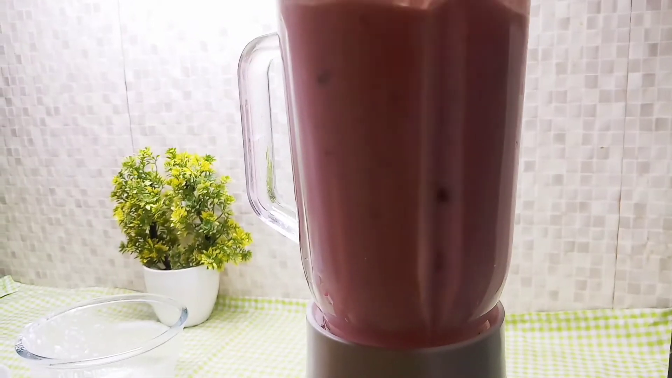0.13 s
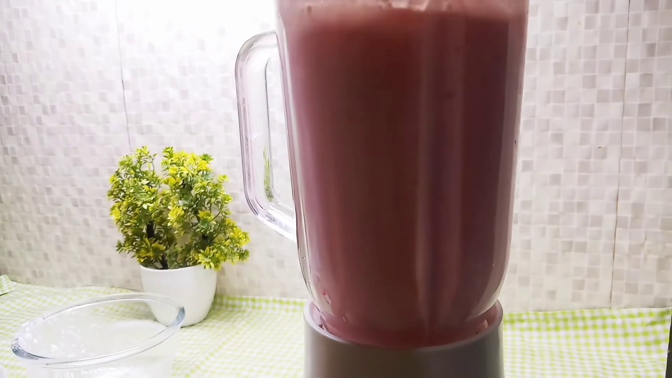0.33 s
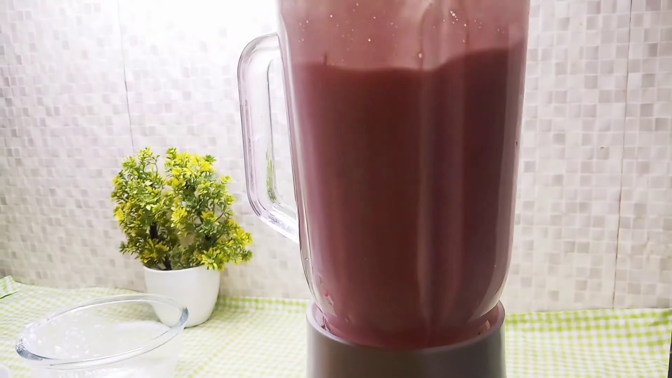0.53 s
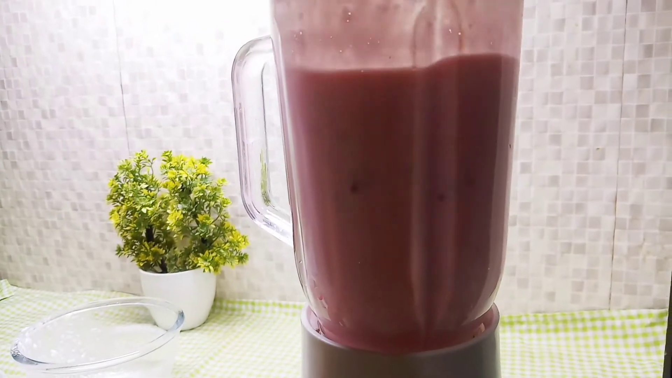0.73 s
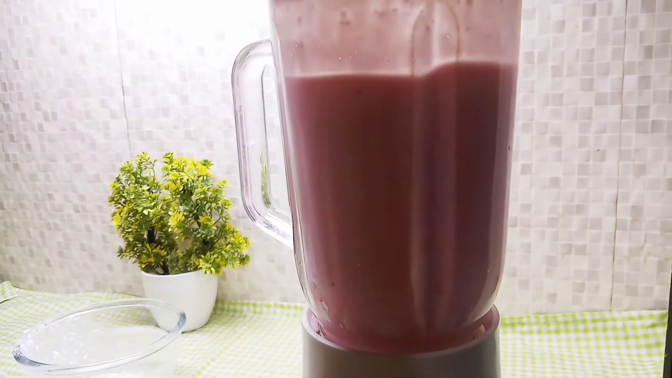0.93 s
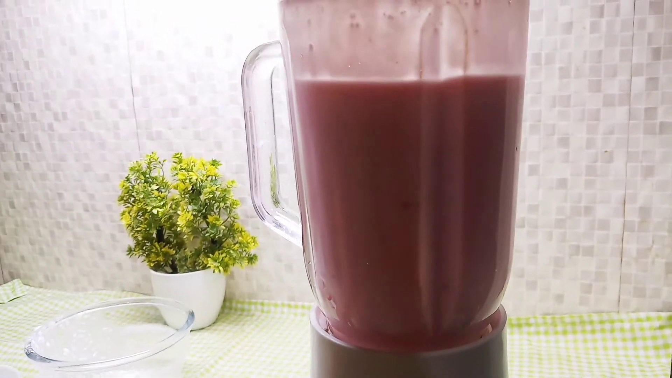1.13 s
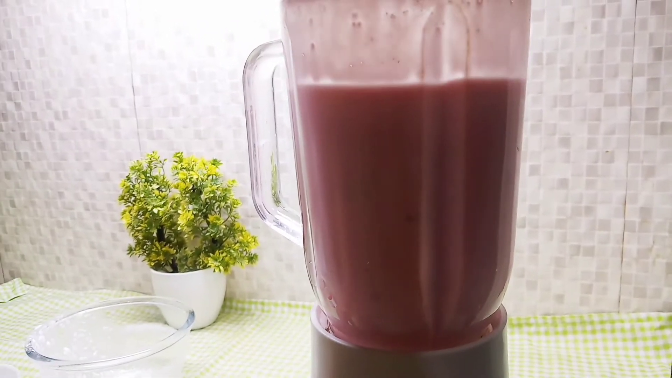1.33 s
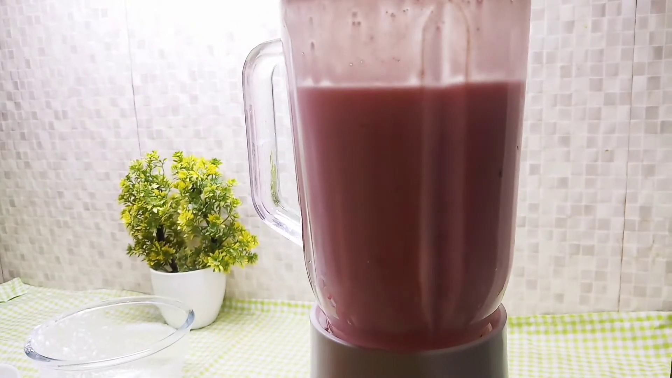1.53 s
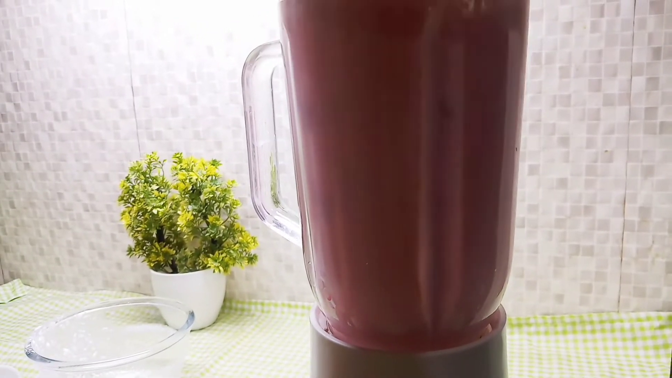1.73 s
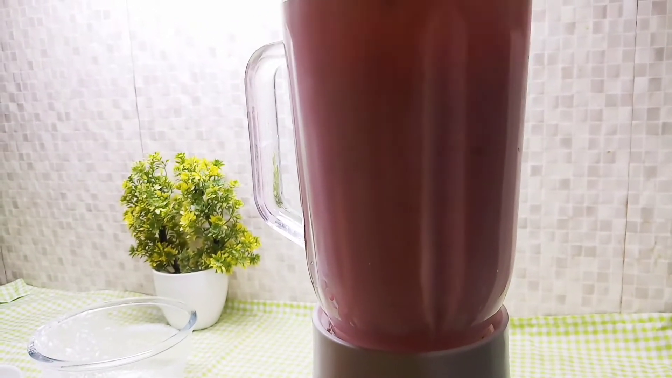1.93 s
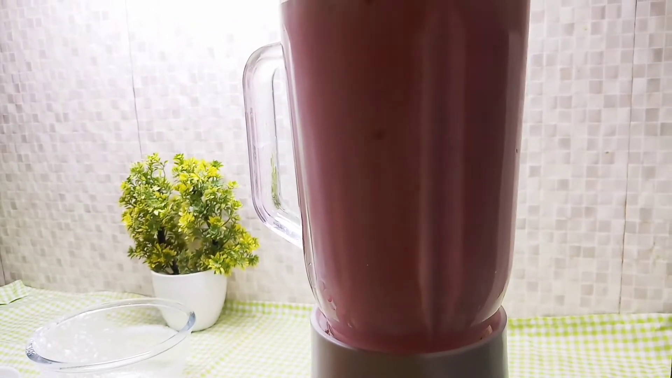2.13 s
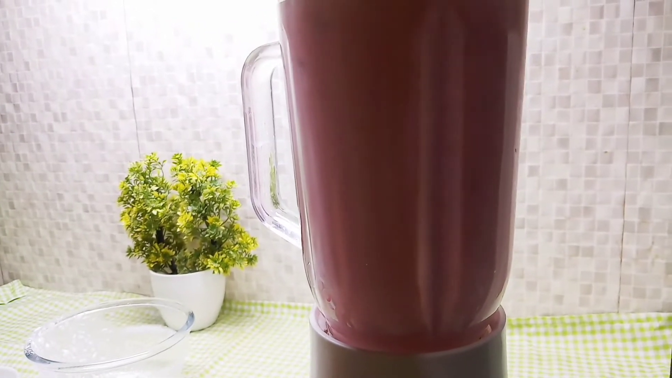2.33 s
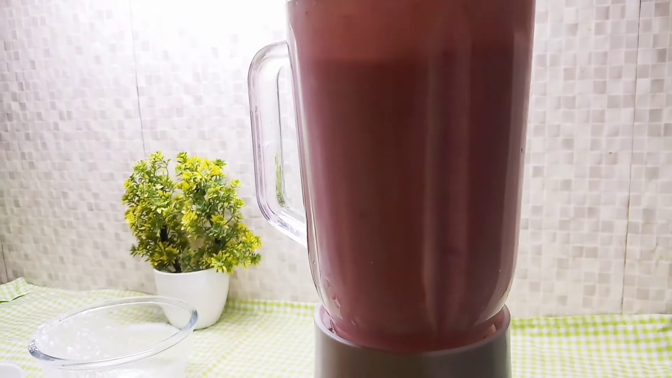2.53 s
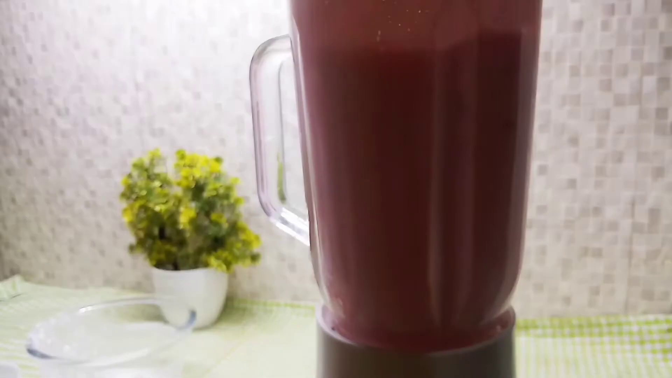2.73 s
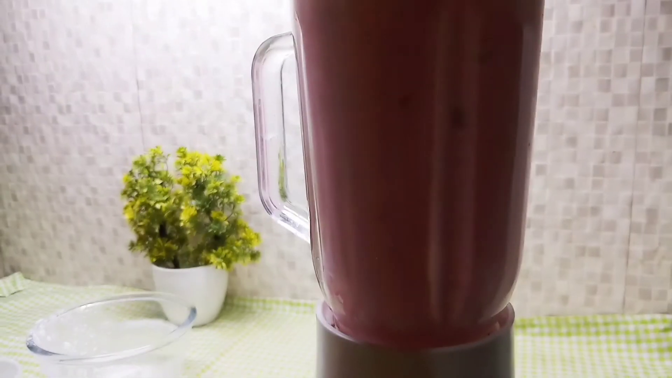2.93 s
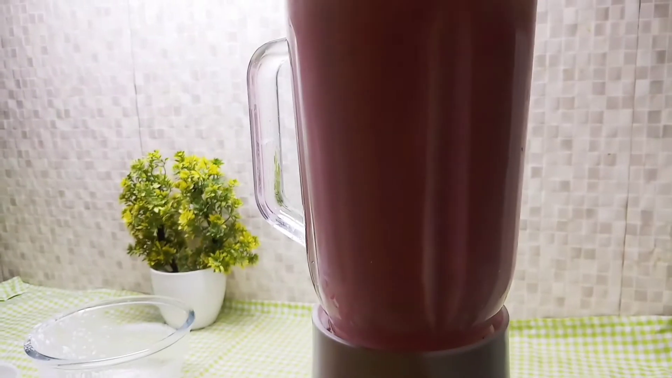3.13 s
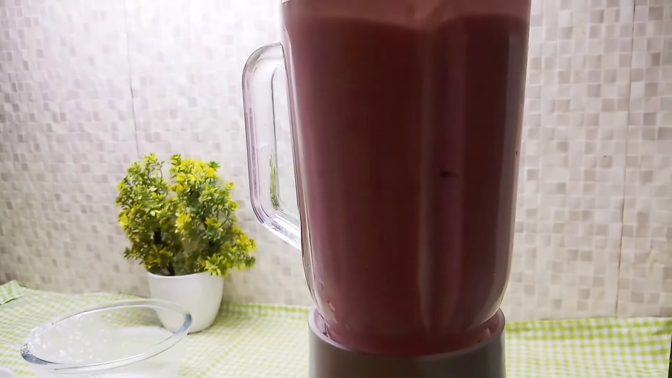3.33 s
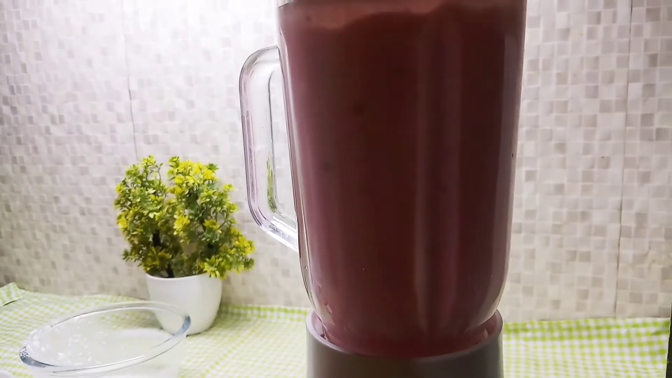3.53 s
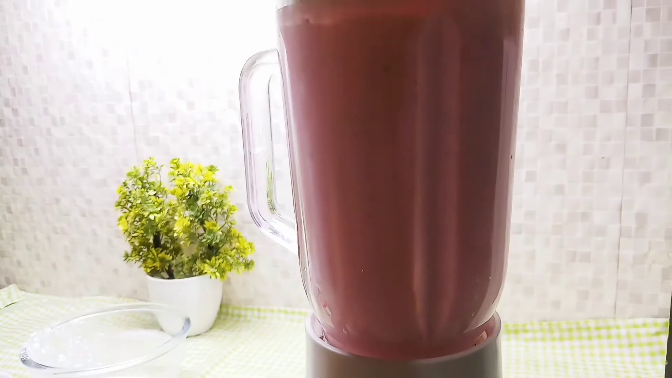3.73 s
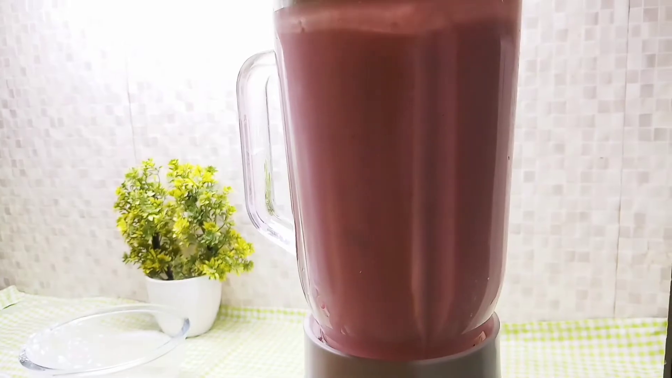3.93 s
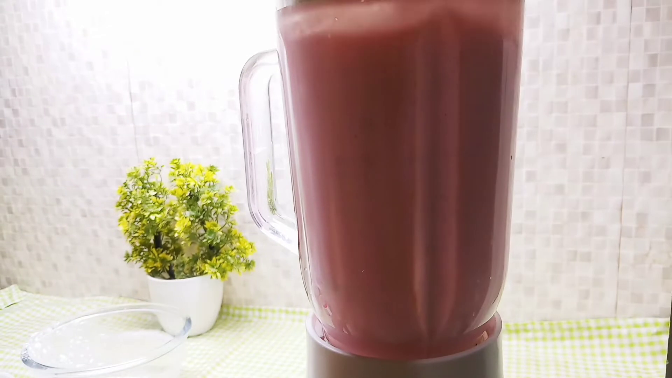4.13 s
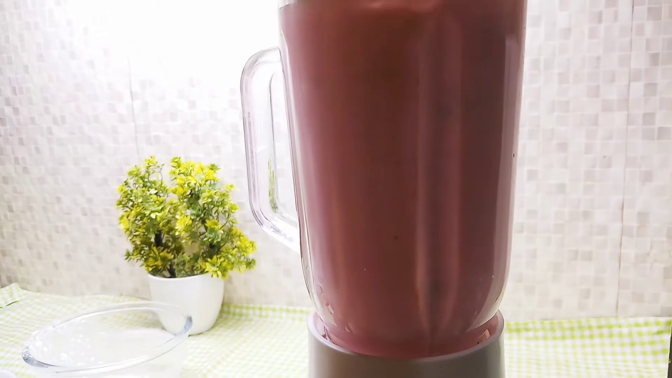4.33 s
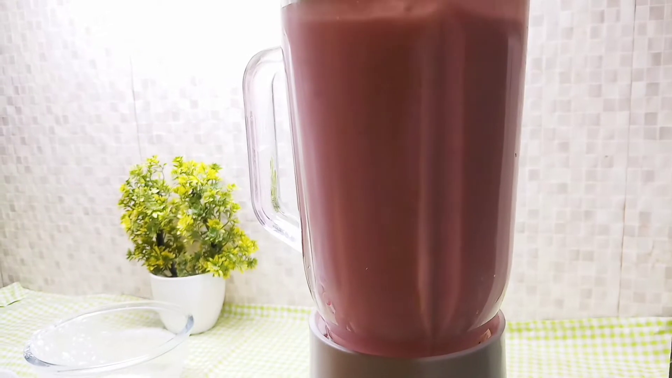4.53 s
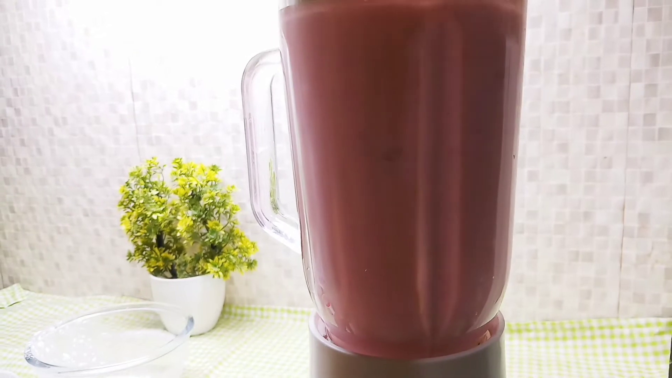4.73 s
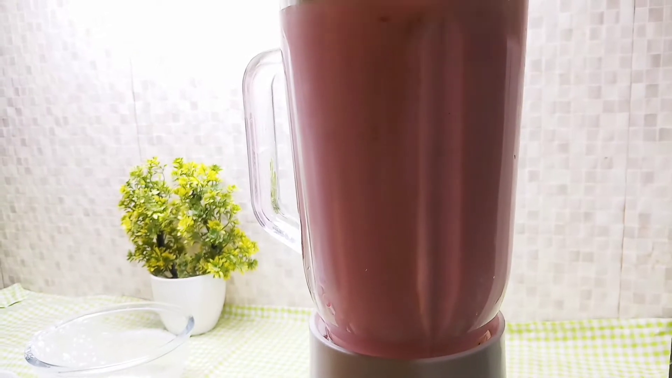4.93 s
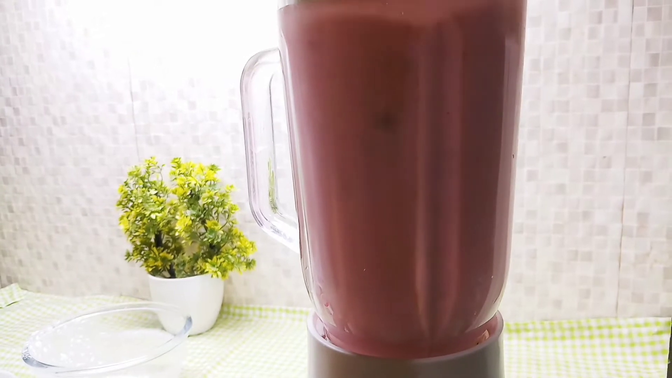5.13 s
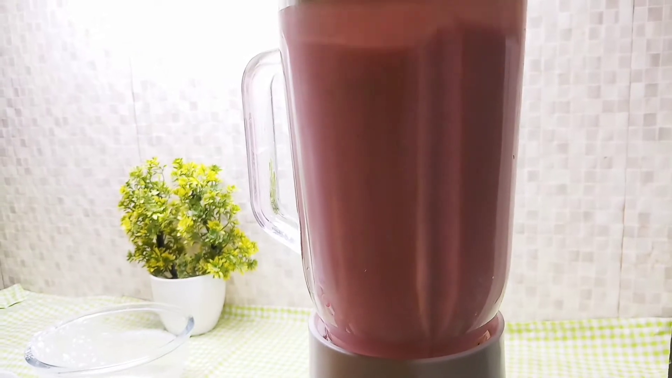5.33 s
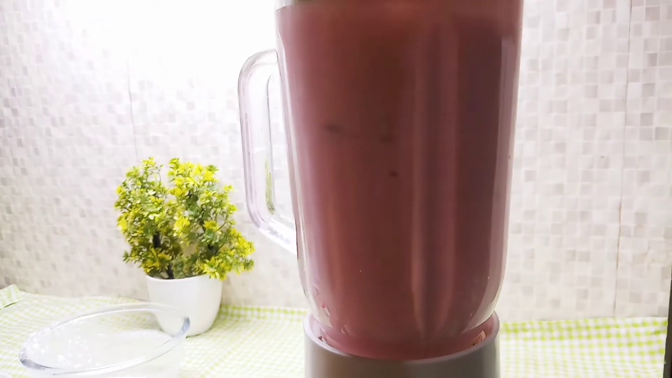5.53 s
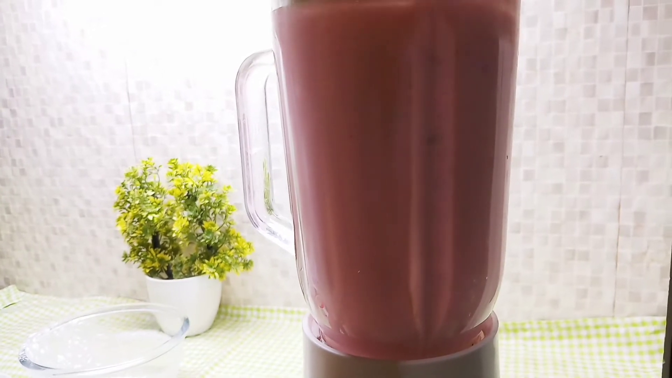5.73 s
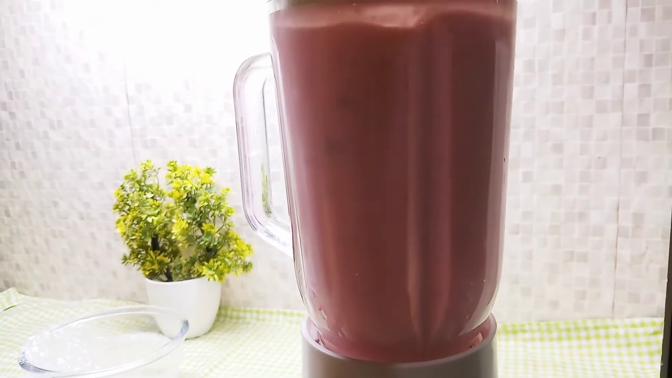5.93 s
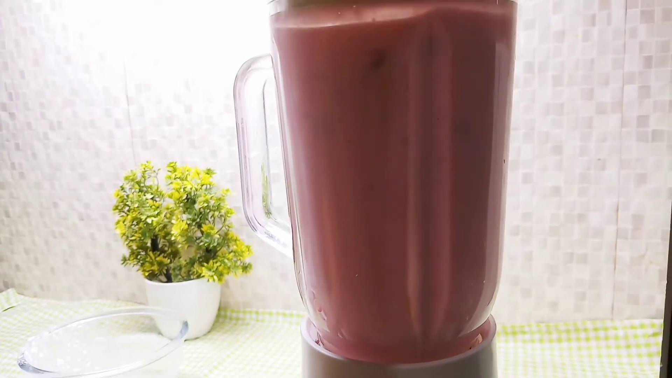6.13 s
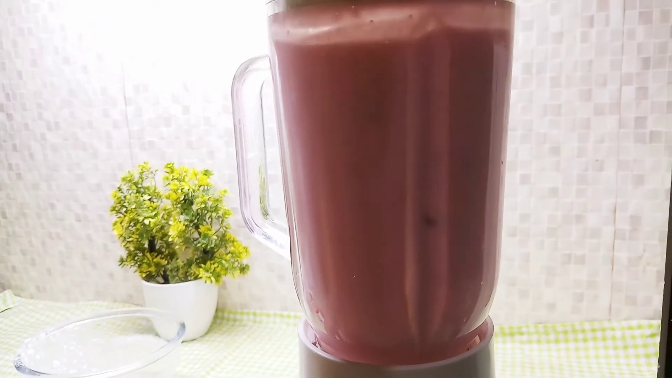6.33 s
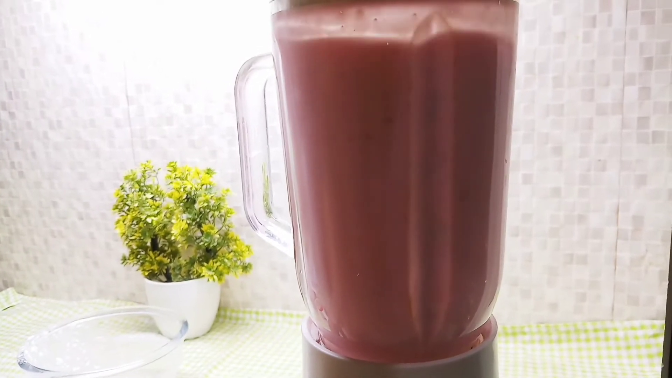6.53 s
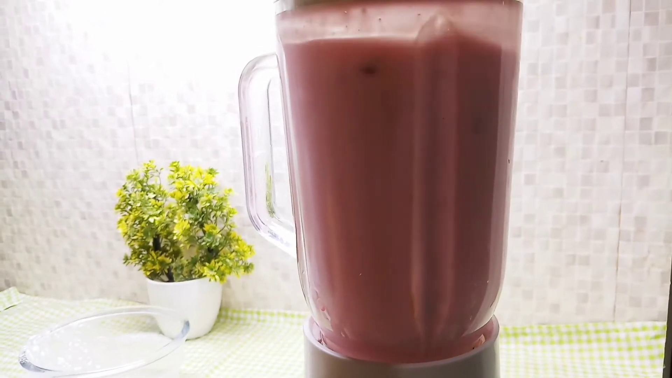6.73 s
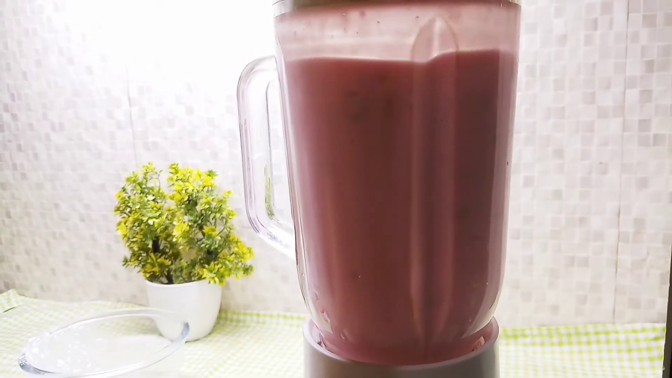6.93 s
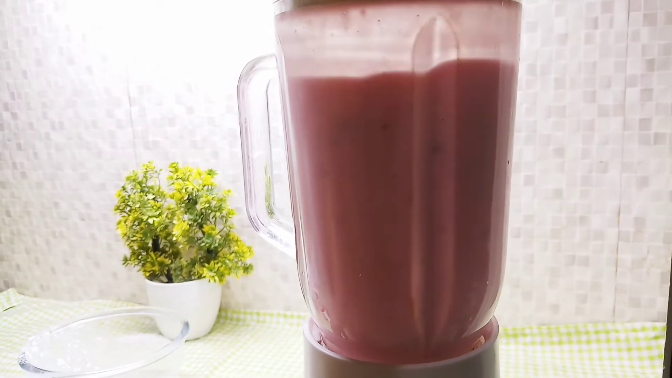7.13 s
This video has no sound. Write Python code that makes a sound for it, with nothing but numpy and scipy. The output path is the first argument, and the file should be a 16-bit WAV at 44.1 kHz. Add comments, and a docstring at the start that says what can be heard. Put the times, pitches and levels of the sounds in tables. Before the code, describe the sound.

A countertop blender coasts to rest, restarts with thick gulps and cracking ice, churns at full speed, then winds down.

```python
"""Ice swirls and clicks in a thick fruit drink as a countertop blender coasts to rest; a few drops fall.
It starts again with heavy gulps and cracks, runs flat out, then winds down.
The blades churn the liquid and grind ice against the ringing jar; the motor hums and whines below.
One microphone position, near the jar, on a worktop close to a tiled kitchen wall."""
import sys
import numpy as np
from scipy import signal
from scipy.fft import rfft, irfft, next_fast_len
from scipy.io import wavfile
from scipy.ndimage import map_coordinates

SR = 44100
rng = np.random.default_rng(int(sys.argv[2]) if len(sys.argv) > 2 else 0)


def file_out(sig):
    """Save sig as 16-bit WAV at sys.argv[1]."""
    # one column per channel
    cols = np.atleast_2d(sig).T
    # limit, then scale
    lim = np.clip(cols, -1, 1)
    pcm = np.round(lim * 32767).astype(np.int16)
    wavfile.write(sys.argv[1], SR, pcm)


N = 316197
TIME = np.arange(N) / SR
EARLIER_OFF_S, ON_S, OFF_S = -.76, 1.27, 5.9  # the switch; the scene opens mid-coast
RUN_S = np.clip(TIME, ON_S, OFF_S) - ON_S  # time spent under power
FULL_SPEED, FRICTION = 180, 35  # turns per s; at the second, liquid drag equals dry friction


def from_db(db):
    """Decibels to gain."""
    return 10 ** (np.asarray(db) / 20)


def rms_one(x):
    """Scale to unit power."""
    return x / np.sqrt(np.mean(x ** 2) + 1e-20)


def drift(per_s):
    """Smooth random wander of unit power."""
    knots = rng.standard_normal(8192)
    return rms_one(map_coordinates(knots, [TIME * per_s], order=2, mode="wrap"))


def swell(at_s, length_s):
    """A smooth rise and fall of height 1, length_s wide at half height."""
    out, near = np.zeros(N), np.abs(TIME - at_s) < length_s
    out[near] = np.cos(np.pi / 2 * (TIME[near] - at_s) / length_s) ** 2
    return out


def lag(x, time_s):
    """Trail behind x with the given time constant."""
    keep = np.exp(-1 / (time_s * SR))
    return signal.lfilter([1 - keep], [1, -keep], x)


def grit(per_s, spread_db):
    """Random tiny impacts, mostly weak, a few strong; about unit power at any rate."""
    sizes = rms_one(from_db(spread_db * np.minimum(rng.exponential(1, N), 4)) * rng.choice([-1, 1], N))
    chance = np.clip(per_s / SR, 1 / N, 1)
    return sizes * (rng.random(N) < chance) / np.sqrt(chance)


def burst(start_s, decay_s, rise_s=.0002, size=4096):
    """One contact: noise that builds up and dies away quickly."""
    out, at, t = np.zeros(N + size), round(start_s * SR), np.arange(size) / SR
    shape = (1 - np.exp(-t / rise_s)) * np.exp(-t / decay_s)
    out[at:at + size] = rng.standard_normal(size) * shape
    return out[:N]


def lift(modes, hz):
    """Gain in dB of a set of resonances."""
    return sum(db / (1 + (2 * (hz - centre) / width) ** 2) for centre, width, db in modes)


def body(x, spectrum, modes=(), size=8192):
    """Minimum-phase filter of unit energy: a broad spectrum with resonances on top."""
    hz = np.maximum(np.fft.rfftfreq(size, 1 / SR), 1)
    points_hz, points_db = np.transpose(spectrum)
    gain_db = np.interp(np.log(hz), np.log(points_hz), points_db) + lift(modes, hz)
    cepstrum = irfft(np.log(from_db(gain_db)))
    response = irfft(np.exp(rfft(2 * cepstrum[:size // 2], size)))
    return signal.oaconvolve(x, response / np.linalg.norm(response))[:N]


def coast(off_s, drag_s=.95):
    """Drag and friction slow the shaft from full speed until it stands."""
    elapsed_s = np.maximum(TIME - off_s, 0)
    return np.maximum((FULL_SPEED + FRICTION) * np.exp(-elapsed_s / drag_s) - FRICTION, 0)


def shaft(spin_up_s=.19):
    """Turns per second: coasting, running up, braked briefly after each knock, coasting again."""
    sag = 13 * sum(from_db(db) * swell(s + .06, length_s=.15) for s, db in WALL_KNOCKS)
    loaded = 178.8 + .5 * RUN_S - sag  # gains a little as the drink thins
    driven = loaded * (1 - np.exp(-RUN_S / spin_up_s)) * (1 + .004 * drift(8))
    return np.where(TIME < ON_S, coast(EARLIER_OFF_S), driven * coast(OFF_S) / FULL_SPEED)


def stirring(speed):
    """Stirring in turns per second: full under power, then slowing with the blades, settling last."""
    driven = np.where((TIME >= ON_S) & (TIME < OFF_S), FULL_SPEED, speed)
    return np.maximum(driven, lag(np.minimum(driven, FRICTION / 2), time_s=.081)) + 1e-6


def follow(stir, full_db, labour_db, thinning_db_per_s, knee_hz, halving_db):
    """Gain as the blades bite, labour until a vortex opens, run on, then slow below the knee."""
    bite_s, labour_s, relief_s = .053, .21, .14
    bite = np.where(TIME < ON_S, 1, np.minimum(RUN_S / bite_s, 1))
    labour = (TIME >= ON_S) * np.clip(1 - (RUN_S - labour_s) / relief_s, 0, 1)
    slowing_db = halving_db * np.log2(np.minimum(stir / knee_hz, 1))
    return bite * from_db(full_db + labour_db * labour - thinning_db_per_s * RUN_S + slowing_db)


# Resonances of the filled jar on its base: centre_hz, width_hz, lift_db
JAR_MODES = [(144, 21, 14), (244, 20, 0), (342, 88, 6), (704, 47, 8.5), (881, 42, 6.5), (1086, 61, 7),
             (1198, 184, 7.5), (1514, 220, 6.5), (1893, 133, 7.5), (2100, 360, 2), (2520, 31, 2),
             (2750, 69, 6.5), (3026, 94, 3), (3240, 165, 5.5), (3890, 57, 5.5), (4326, 310, 6),
             (4650, 48, 4), (4940, 180, 6), (5330, 280, 4.5), (5700, 77, 4.5), (5863, 220, 6.5),
             (6145, 247, 9.5), (6710, 120, 8.5), (6890, 260, 5), (7290, 340, 7.5), (7920, 390, 8),
             (8830, 190, 6), (10100, 160, 7)]
# Bands the jar mostly radiates poorly: centre_hz, width_hz, lift_db
JAR_HOLLOWS = [(466, 23, -3), (985, 100, 0), (1934, 72, 2), (2380, 62, -7.5), (3700, 150, -0.5),
               (6530, 330, -3), (7700, 250, -3)]
def jar(x, spectrum):
    """Sound leaves through the jar wall and takes on its peaks and hollows."""
    return body(x, spectrum, list(JAR_MODES) + list(JAR_HOLLOWS))


# Paths of a shock round the jar: delay_s, feedback_share (capped below)
SHOCK_PATHS = [(.00047, 0.55), (.00083, 0.94), (.00137, .35), (.0029, 0.66)]
def wall_smear(x):
    """Shocks run round the jar wall and smear over a few milliseconds, keeping their colour."""
    size = next_fast_len(N + 8192)
    spectrum, hz = rfft(x, size), np.fft.rfftfreq(size, 1 / SR)
    for delay_s, share in SHOCK_PATHS:
        lap, feedback = np.exp(-2j * np.pi * hz * delay_s), min(share, .8)
        spectrum = spectrum * (lap - feedback) / (1 - feedback * lap)
    return irfft(spectrum, size)[:N]


# Colour of ice on the jar: frequency_hz, level_db
ICE_SPECTRUM = [(40, -24), (70, -15), (130, -8), (300, -8), (600, 0.5), (1300, -3.5), (2400, 2.5),
                (3700, 1), (5300, 5), (6600, -3.5), (8500, -1.5), (9600, -19), (12000, -19), (15500, -24)]
# The swirl dulls as it slows and brightens as it settles: turns_per_s, treble_db
TREBLE_BY_STIR = [(1, 0), (5, -6), (14, -20), (40, -10), (65, 0), (160, -2)]
def swirl(speed, stir, take_over_s=.26):
    """With the power off, ice crumbs patter on the jar, more sparsely as it slows."""
    coasting = np.where(TIME < ON_S, 1, np.clip((TIME - OFF_S) / take_over_s, 0, 1))
    strength = np.sqrt(coasting) * from_db(-19.5 + 7.5 * np.log2(stir / FULL_SPEED))
    patter = from_db(-2.5) * rng.standard_normal(N) + from_db(-4) * grit(25 * speed + 600, spread_db=3)
    # each turn flings a handful of its own size, which dies away before the next
    turns = np.cumsum(speed) / SR
    handful = from_db(3.36 * np.clip(rng.standard_normal(2048), -2, 1.7))[turns.astype(int)]
    passes = from_db(-5) + from_db(4.5) * handful * np.exp(-4.5 * (turns % 1)) * np.clip(speed / 40, 0, 1)
    sound = jar(patter * passes * strength, ICE_SPECTRUM)
    dull = signal.sosfilt(signal.butter(1, 4500, fs=SR, output="sos"), sound)
    return dull + (sound - dull) * from_db(np.interp(stir, *np.transpose(TREBLE_BY_STIR)))


# Larger pieces striking: start_s, crack_db, snap_db
ICE_STRIKES = [(.0306, -13.5, -50), (0.05, -19, -40), (0.1215, -8, -32), (.164, -22, -44),
               (0.2006, -13.5, -35), (.2607, -19, -42), (.2791, -19, -38), (.2927, -12, -40),
               (.308, -22, -44), (0.3602, -18.5, -42), (0.3692, -21, -44), (.4, -20.5, -49),
               (.427, -22, -55), (.4444, -26, -55), (0.5258, -13.5, -34.5), (.5372, -15, -45),
               (.5526, -12.5, -44), (.561, -24, -43), (0.613, -23, -58), (0.6561, -13, -42),
               (0.671, -20, -44), (0.702, -26, -44), (.709, -31, -43), (1.2707, -19, -48), (1.367, 2, -26),
               (1.3872, 2, -19.5), (1.4506, 0, -27), (1.4895, 0, -25), (1.5314, 0, -28),
               (1.5404, -2.5, -33), (1.642, -3.5, -30), (1.7187, -1, -29), (1.7466, 0.5, -29),
               (1.8322, -1.5, -27), (2.075, 0, -23), (2.112, -3.5, -27), (2.267, 1, -24),
               (2.3745, -2.5, -34), (2.7531, -1.5, -21), (2.8675, 0, -29), (2.902, -0.5, -30.5),
               (3.1107, -1, -25.5), (3.2183, -1.5, -25), (3.7494, 0, -21), (3.9488, -6.5, -27),
               (4.106, -3.5, -25.5), (4.6893, -1.5, -32), (5.0817, 1.5, -35.5), (5.605, -3.5, -34.5),
               (6.0, -7, -43), (6.0637, -3.5, -24.5), (6.2225, -10.5, -38.5), (6.287, -8.5, -29),
               (6.2945, -7, -32), (6.3477, -4.5, -28), (6.391, -12, -37.5), (6.4692, -7.5, -32),
               (6.51, -7, -29), (6.5224, -11.5, -37), (6.5493, -14, -44), (6.6214, -8, -36),
               (6.6883, -14, -41), (6.699, -13, -35), (6.7532, -14, -43.5), (6.841, -15, -50),
               (6.8563, -9.5, -36), (6.8751, -9, -38.5), (6.9292, -24.5, -49), (7.029, -25, -63),
               (7.1057, -13, -60)]
# Colour of brittle ice snapping: frequency_hz, level_db
SNAP_SPECTRUM = [(300, -51), (3000, -10), (8000, 12), (10500, -1), (12500, -16), (15500, -25)]
def ice(crack_decay_s=.0057, snap_decay_s=.0036, rise_s=.00059):
    """Ice cracks against blade and jar; brittle pieces add a short bright snap."""
    cracks = sum(from_db(db) * burst(s, crack_decay_s, rise_s) for s, db, _ in ICE_STRIKES)
    snaps = sum(from_db(db) * burst(s, snap_decay_s, rise_s) for s, _, db in ICE_STRIKES)
    return from_db(-5.5) * jar(cracks, ICE_SPECTRUM) + from_db(12.5) * body(snaps, SNAP_SPECTRUM)


# Air pockets collapsing: peak_s, thud_db, gurgle_db, slop_db, length_s
AIR_POCKETS = [(0.032, -45, -47, -39, .07), (0.703, -52, -49, -38, 0.037), (0.934, -50, -58, -55, 0.054),
               (1.318, -31, -27, -26.5, 0.06), (1.388, -39, -26, -25, 0.05),
               (1.457, -24, -19, -18.5, 0.048), (1.537, -33, -24, -20.5, 0.083),
               (2.107, -44, -32, -26.5, .06), (2.668, -49, -38, -23.5, 0.024),
               (2.974, -45, -38.5, -25.5, .03), (3.127, -41, -38, -42, 0.038),
               (3.501, -44, -27, -43, 0.032), (3.77, -42.5, -31.5, -35, 0.055),
               (4.4, -40.5, -29.5, -29, 0.055), (5.61, -53, -35, -24.5, 0.047),
               (6.457, -37, -42, -31, 0.22), (6.818, -41.5, -34, -40, 0.08), (6.881, -46, -40, -27.5, .025),
               (7.111, -44, -52, -27, 0.016)]
# Colours of big pockets, smaller ones and the vortex hollow: frequency_hz, level_db
THUD_SPECTRUM = [(30, -34), (50, -25), (75, -8), (105, 1), (140, 2), (175, -12.5), (300, -23), (2000, -73)]
GURGLE_SPECTRUM = [(100, -24), (190, -4), (240, 2.5), (295, -4.5), (355, -1), (480, -18.5), (2000, -58),
                   (8000, -89)]
SLOP_SPECTRUM = [(200, -33), (540, -14), (650, -4.5), (700, 3), (780, -6), (880, -4), (990, -11),
                 (1200, -7), (1500, -20), (8000, -65)]
def gulps(stir):
    """Air collapses in the thick liquid: big pockets thud, smaller ones gurgle, the vortex slops."""
    voices = [(THUD_SPECTRUM, follow(stir, -47.5, 10, -.5, knee_hz=64, halving_db=7)),
              (GURGLE_SPECTRUM, follow(stir, -45.5, 19, -.52, knee_hz=34, halving_db=8)),
              (SLOP_SPECTRUM, follow(stir, -33, 8.5, -.37, knee_hz=104, halving_db=8.5))]
    out = 0
    for column, (spectrum, gain) in enumerate(voices, start=1):
        pockets = from_db(-2) * rng.standard_normal(N) + from_db(-6.5) * grit(400, spread_db=1.5)
        collapses = sum(from_db(row[column]) * swell(row[0], row[-1]) for row in AIR_POCKETS)
        bubbling = gain * from_db(2 * drift(18))
        out += body(pockets * np.hypot(collapses, bubbling), spectrum)
    return from_db(-1.5) * out


# Drops and bubbles in the settling jar: start_s, tick_db, fizz_db
FALLING_DROPS = [(.7614, -31, -44), (.815, -36, -39), (.851, -36, -44), (.8604, -43, -48),
                 (0.9136, -25.5, -60), (.94, -30, -54), (1.064, -48, -75), (1.1019, -44, -75),
                 (1.161, -35.5, -62), (1.1952, -42, -74), (1.2166, -37, -58)]
# Colours of a drip and of bursting froth: frequency_hz, level_db
DRIP_SPECTRUM = [(100, -11), (1000, -5), (2400, -7.5), (4500, 2), (8000, -2), (11000, -27), (15500, -22)]
FROTH_SPECTRUM = [(1000, -35), (5000, -10), (8300, 0.5), (10500, -1), (12000, -8.5), (13500, -9),
                  (15500, -13)]
# Air space above the drink: centre_hz, width_hz, lift_db
HEADSPACE_MODES = [(1550, 230, 3), (3320, 720, 14), (5900, 1200, 7.5), (8800, 480, 10)]
def drops():
    """Drops tick brightly in the jar's air space; bursting bubbles add a fizz."""
    ticks = sum(from_db(db) * burst(s, decay_s=.0055) for s, db, _ in FALLING_DROPS)
    fizz = sum(from_db(db) * burst(s, decay_s=.004) for s, _, db in FALLING_DROPS)
    ringing = body(ticks, DRIP_SPECTRUM, HEADSPACE_MODES)
    return from_db(-6.5) * ringing + from_db(-.5) * body(fizz, FROTH_SPECTRUM)


# Clumps of crushed ice drawn through the blades: peak_s, lift_db, length_s
ICE_CLUMPS = [(1.855, 4, 0.029), (2.074, 2.5, 0.12), (2.538, 2, .03), (2.672, 4.5, 0.026),
              (2.805, 2.5, 0.037), (2.853, 3, 0.063), (3.033, 5, .025), (3.106, 2, 0.061),
              (3.233, 0, 0.049), (3.603, 2.5, .04), (3.76, 1, .04), (4.11, 2, 0.028), (4.223, 5, 0.042),
              (5.12, 2.5, 0.02), (5.217, 5, 0.019), (5.374, 3.5, 0.03), (5.52, 1.5, .03),
              (5.614, 2.5, 0.061), (5.784, 3, 0.075), (5.879, 2, 0.058)]
# Colour of the churning: frequency_hz, level_db
CHURN_SPECTRUM = [(40, -41), (70, -19), (130, -20.5), (300, -11.5), (600, -4.5), (1300, -9.5), (2400, -3),
                  (3700, -6.5), (5300, 2), (6600, -8), (8500, -10.5), (9600, -18), (12000, -25),
                  (15500, -37)]
def churn(speed, stir):
    """The blades whip up turbulence and grind ice, swelling as clumps pass through."""
    surge = rms_one(from_db(.73 * drift(45) + 2.06 * drift(350)))
    clumps = from_db(sum(db * swell(s, length_s) for s, db, length_s in ICE_CLUMPS))
    grinding = from_db(-3) * rng.standard_normal(N) + from_db(-2.5) * grit(25 * speed + 300, spread_db=3.5)
    gain = follow(stir, full_db=-17, labour_db=3, thinning_db_per_s=.1549, knee_hz=183, halving_db=25)
    return jar(grinding * surge * clumps * gain, CHURN_SPECTRUM)


# Big lumps hitting the jar wall: peak_s, level_db
WALL_KNOCKS = [(1.385, -14), (1.497, -21), (1.649, -18), (1.725, -15.5), (2.06, -13.5), (2.276, -23),
               (2.377, -21), (2.669, -21), (2.759, -19), (2.903, -15), (3.113, -17), (3.439, -23),
               (3.605, -22), (3.837, -19.5), (4.21, -19.5), (4.25, -20.5), (4.373, -18.5), (4.54, -16.5),
               (4.647, -18), (4.697, -16.5), (5.086, -27), (5.224, -23.5), (5.612, -17), (6.06, -22)]
# Colour of a soft thump: frequency_hz, level_db
THUMP_SPECTRUM = [(40, -19), (100, -4), (600, -4), (2500, 2), (5000, -2.5), (15000, -63)]
# Wall modes the lumps set ringing: centre_hz, width_hz, lift_db
WALL_MODES = [(1150, 200, 11), (1905, 150, 15), (2030, 150, 10), (2740, 140, 6)]
def lumps(stir):
    """Soft lumps thump the jar wall: single knocks over a running patter."""
    knocks = sum(from_db(db) * swell(s, length_s=.024) for s, db in WALL_KNOCKS)
    patter = follow(stir, full_db=-25, labour_db=7.5, thinning_db_per_s=1.1, knee_hz=142, halving_db=27)
    impacts = grit(420, spread_db=3) * np.hypot(knocks, patter)
    return from_db(-3.5) * body(impacts, THUMP_SPECTRUM, WALL_MODES)


def spray(speed, stir, mist_db=-17):
    """Droplets and froth fizz over a fine mist, more of them the faster the blades turn."""
    droplets = grit(2 * speed + 130, spread_db=6) ** 2
    splashes = np.sqrt(lag(droplets, time_s=.0014))
    gain = follow(stir, full_db=-35.5, labour_db=4, thinning_db_per_s=1.3, knee_hz=175, halving_db=9.5)
    fizz = rng.standard_normal(N) * np.hypot(splashes, from_db(mist_db)) * gain
    return from_db(-.5) * body(fizz, FROTH_SPECTRUM)


# Hum, brush whine, bearing whine, thin top whistle: shaft_multiple, level_db, flutter_db
MOTOR_TONES = [(1, -47.7, 0.7), (12, -41.5, 2.2), (12.58, -37.5, 1.8), (83.9, -61.5, 3)]
# The base shakes as a tone passes its resonance: centre_hz, width_hz, lift_db
BASE_MODE = [(139, 36, 22)]
def motor(speed):
    """Unbalance hums at the shaft rate; the whines come up only near full speed."""
    turns = np.cumsum(speed * (1 + .001 * drift(35))) / SR
    out = 0
    for multiple, db, flutter_db in MOTOR_TONES:
        growth = (speed / FULL_SPEED) ** (2.4 if multiple < 2 else 10)
        gain = from_db(db + flutter_db * drift(15) + lift(BASE_MODE, multiple * speed))
        out += np.sqrt(2) * gain * growth * np.sin(2 * np.pi * multiple * turns)
    return out


# Colour of the quiet kitchen: frequency_hz, level_db
ROOM_SPECTRUM = [(30, -29), (80, 10), (130, -9), (200, -5), (400, -22), (1500, -20), (5000, -17),
                 (9000, -31), (15000, -34)]
def kitchen(x, wet_db=-11.5, t60_low_s=.5, t60_high_s=.1, split_hz=5000):
    """Tiles and worktop reflect into the microphone, treble dying first, over faint room tone."""
    t = np.arange(20000) / SR
    noise = rng.standard_normal(len(t))
    low = signal.sosfilt(signal.butter(1, split_hz, fs=SR, output="sos"), noise)
    tail = low * from_db(-60 * t / t60_low_s) + (noise - low) * from_db(-60 * t / t60_high_s)
    tail *= t > .002  # the near wall answers after 2 ms
    wet = from_db(wet_db)
    reflections = wet * signal.oaconvolve(x, tail / np.linalg.norm(tail))[:N]
    room_tone = from_db(-62.5) * body(rng.standard_normal(N), ROOM_SPECTRUM)
    return (x + reflections) / np.sqrt(1 + wet ** 2) + room_tone


def scene():
    """The blender in its kitchen from one point, the same on both channels."""
    speed = shaft()
    stir = stirring(speed)
    mixture = wall_smear(swirl(speed, stir) + churn(speed, stir) + lumps(stir))
    mixture += ice() + gulps(stir) + drops() + spray(speed, stir)
    sound = kitchen(mixture) + motor(speed)
    return np.array([sound, sound])


def record(dry):
    """The microphone chain rounds the highest peaks and cuts the deep bass and the top."""
    rounded = .94 * dry / (1 + dry ** 4) ** (1 / 4)
    thinned = signal.sosfilt(signal.butter(4, 54, "high", fs=SR, output="sos"), rounded)
    return signal.sosfilt(signal.ellip(12, .1, 80, 15900, fs=SR, output="sos"), thinned)


dry = scene()
out = record(dry)
file_out(out)
```